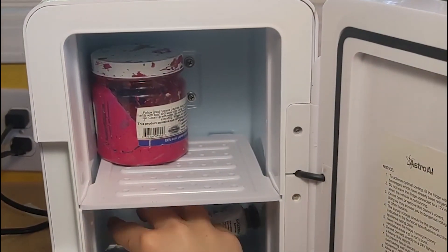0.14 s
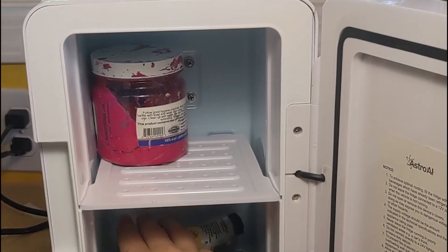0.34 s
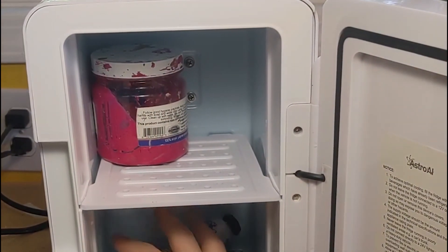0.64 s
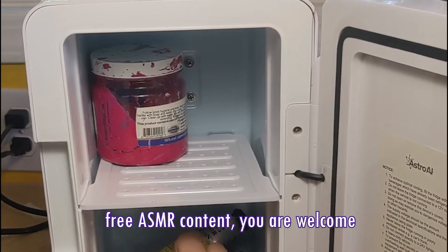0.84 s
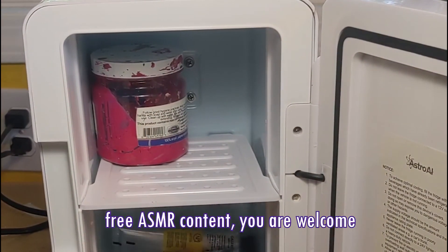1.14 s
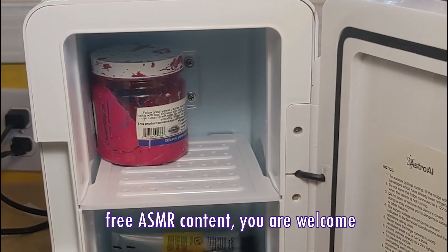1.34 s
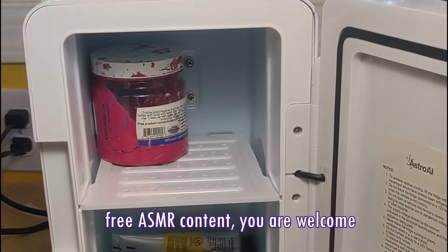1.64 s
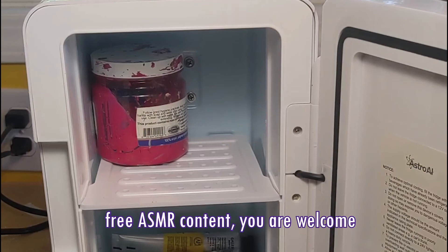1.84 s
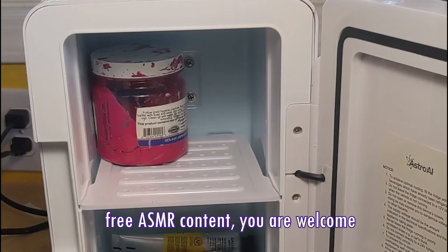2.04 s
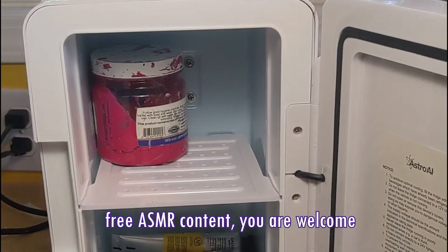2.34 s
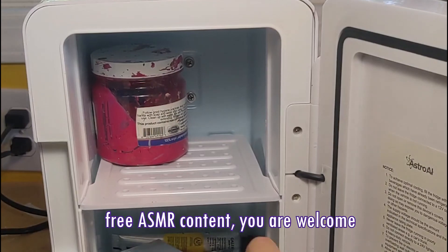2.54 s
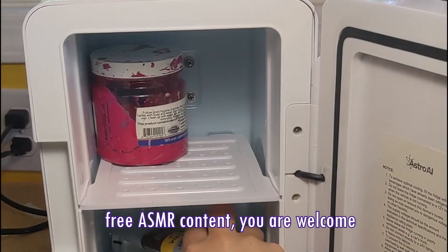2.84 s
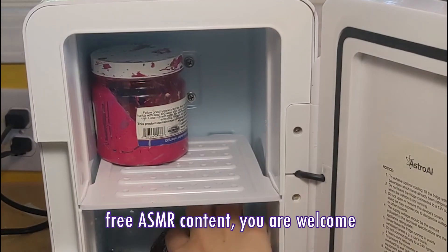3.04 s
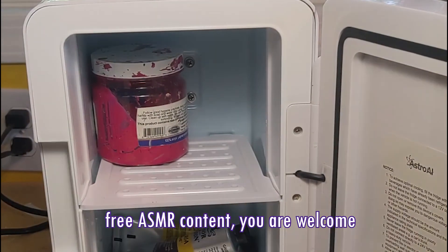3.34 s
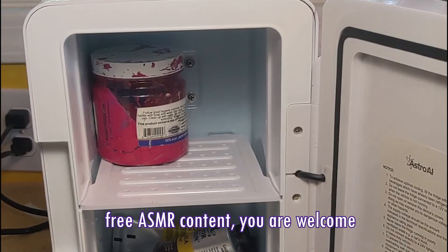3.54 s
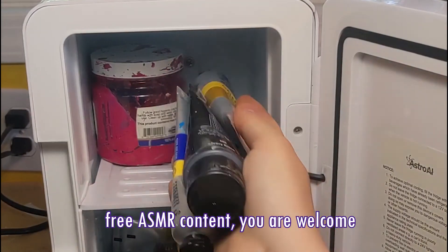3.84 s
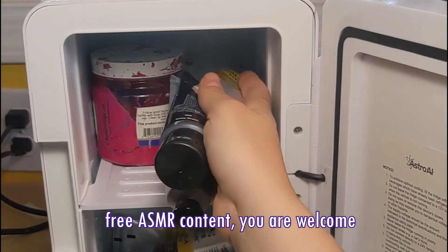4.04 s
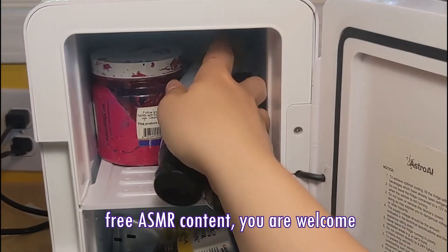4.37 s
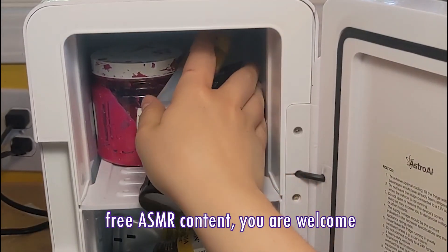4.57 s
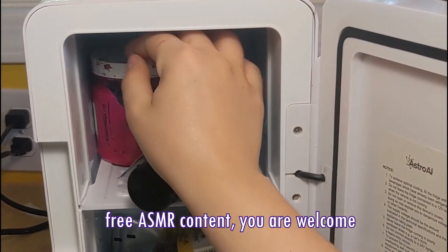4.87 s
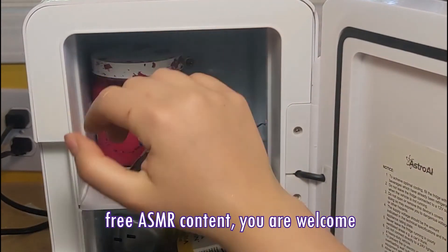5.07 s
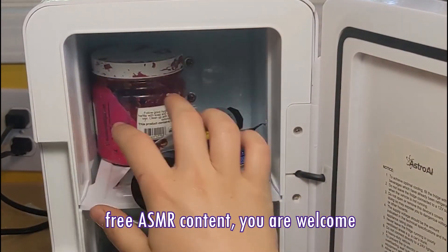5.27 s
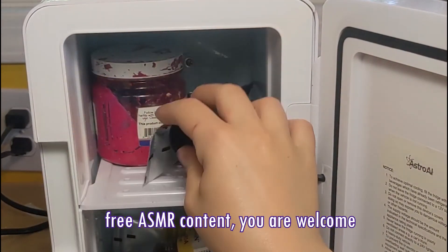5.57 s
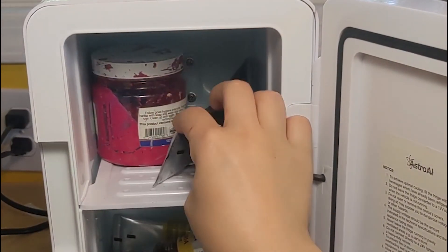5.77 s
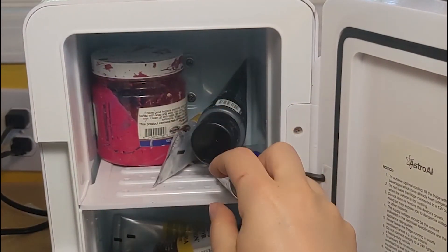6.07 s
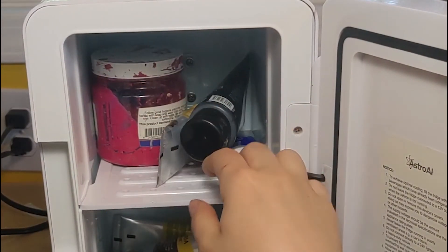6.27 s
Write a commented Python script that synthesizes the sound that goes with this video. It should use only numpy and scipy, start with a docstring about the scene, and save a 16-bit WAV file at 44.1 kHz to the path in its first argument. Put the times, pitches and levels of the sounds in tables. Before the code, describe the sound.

A small cooling fan hums faintly and steadily throughout, a soft airy noise with slightly wavering tones. Very close stereo microphones hear plastic paint tubes handled in a hollow little fridge. A strong boxy knock lands around 0.25 s, light touches near 0.6 s, then firm clacks at 0.9-1.2 s. From 1.5 to 2.5 s come light ticks and short, gritty stick-slip scrapes, with a clearer knock near 2.05 s. Hard knocks at 2.67 and 2.84 s lead into smaller taps and scrapes until 3.3 s. Only the fan remains until a faint slide near 4 s. Clicks and scrapes crowd 4.2-5.1 s, strongest around 4.85 s. After a quieter spell and a soft drag near 5.5 s, a very hard, bright, slightly overloaded clack strikes at 5.7 s. Another lull follows, then a few dull knocks and a short scrape at 6.1-6.4 s. Every blow rings briefly.

```python
"""A small cooling fan hums faintly all through, while a hand packs plastic paint tubes into a small fridge.
Firm knocks come first, then light ticks and short scrapes as pushed tubes stick and slip along the plastic.
More knocks and scrapes follow, with a pause after 3.3 s; a very hard knock comes near 5.7 s, then a few more.
Each blow adds ringing modes of the hollow cabinet to dense coloured noise, split into thud, knock, clack
and tick. Slides are trains of tiny blows, the fan is shaped noise, and the loudest peaks overload."""
import sys
import numpy as np
from scipy import signal
from scipy.fft import rfft, irfft, next_fast_len
from scipy.io import wavfile

SR = 44100
rng = np.random.default_rng(int(sys.argv[2]) if len(sys.argv) > 2 else 0)


def master_out(mix):
    """Clip the mix to full scale and print it as 16-bit PCM to the path in sys.argv[1]."""
    frames = np.transpose(np.atleast_2d(mix))
    ceiling = np.clip(frames, -1, 1)
    pcm = np.round(ceiling * 32767).astype(np.int16)
    wavfile.write(sys.argv[1], SR, pcm)


N = 282681
RING = np.arange(9000) / SR  # time axis of one ringing blow, in seconds

# The four voices of struck plastic: thud, knock, clack and tick.
# Each row: low edge in Hz, high edge in Hz, dense ringing against the modes in dB, crack level in dB,
# early decay time in s, tail level in dB, time for the tail to fall 60 dB in s.
VOICES = [(50, 165, 5.5, -6, 0.04, -7, 0.36), (209, 820, -0.5, -12, 0.0079, -11.5, 0.28),
          (759, 3340, 5, 0, 0.01, -7.5, 0.24), (3840, 40000, 6, 2, 0.0057, -8, 0.2)]


def amp(db):
    """Turns decibels into a gain."""
    return 10 ** (np.asarray(db) / 20)


def evened(x):
    """Scales a sound to an rms level of 1."""
    return x / np.sqrt(np.mean(x ** 2) + 1e-20)


def unit(x):
    """Scales a sound to an average energy of 1 per channel."""
    return evened(x) / np.sqrt(x.shape[-1])


def read(points, hz):
    """Reads a table between its points, on a log-frequency axis."""
    f, value = np.transpose(points)
    return np.interp(np.log(hz + 1), np.log(f), value)


def add(mix, s, sound):
    """Mixes a sound in, starting at s seconds."""
    part = mix[:, max(round(s * SR), 0):][:, :sound.shape[-1]]
    part += sound[:, :part.shape[-1]]


def band(x, low_hz, high_hz):
    """Keeps only the sound between two frequencies."""
    edges_hz = [low_hz, min(high_hz, SR * .45)]
    return signal.sosfilt(signal.butter(N=3, Wn=edges_hz, btype="band", fs=SR, output="sos"), x)


def noise(spectrum, same, size, count=1):
    """Makes rows of coloured stereo noise whose two sides are partly alike."""
    hz = np.fft.rfftfreq(size, 1 / SR)
    left, other = rfft(rng.standard_normal((2, count, size))) * amp(read(spectrum, hz))
    likeness = np.clip(read(same, hz), 0, 1)
    right = likeness * left + np.sqrt(1 - likeness ** 2) * other
    return evened(irfft(np.stack([left, right], axis=1), size))


def fan(air_db=-47.5, width_hz=3.1):
    """Moving air is broad noise; the fan and its housing add narrow noise bands, heard as wavering tones."""
    # Each row: frequency in Hz, relative level of room and fan air in dB per Hz.
    air_spectrum = [(15, -30), (25, -19), (55, -4), (84, -20.5), (123, -9), (256, -9.5), (293, -4),
                    (384, -10.5), (607, -10.5), (775, -16.5), (1190, -12), (1400, -15.5), (1520, -18),
                    (2840, -25.5), (16000, -45.5)]
    # Each row: frequency in Hz, left-right likeness from 0 to 1.
    air_likeness = [(60, 0.48), (180, 1), (550, 0.38), (1650, 0.006), (5000, 0.034), (15000, 0.22)]
    # Each row: tone of the fan or its housing in Hz, level in dB.
    fan_tones = [(291, -64.5), (500, -67), (613, -59.5), (872, -74), (996, -68), (1168, -59), (1502, -66.5),
                 (1836, -68.5)]
    size = next_fast_len(N)
    hz = np.fft.rfftfreq(size, 1 / SR)
    lines = sum(amp(db) / (1 + ((hz - f) / width_hz) ** 2) for f, db in fan_tones)
    hum = evened(irfft(rfft(rng.standard_normal(size)) * lines, size))
    hum = hum * np.linalg.norm(amp([db for _, db in fan_tones]))
    air = amp(air_db) * noise(air_spectrum, air_likeness, size=size)[0]
    return (air + hum)[:, :N]


def shell(x, ring_hz, ring_db=4, sharpness=11, overtone=1.65, overtone_db=-5, cap_hz=2800, cap_db=4):
    """The tube wall stresses one resonance and its overtone; stiff caps ring higher and more clearly."""
    cap = np.clip(1 + 3 * np.log2(ring_hz / cap_hz), 0, 1)  # 0 for a soft tube, 1 for a stiff cap

    def resonance(hz):
        return signal.lfilter(*signal.iirpeak(min(hz, SR * .4), sharpness, fs=SR), x)

    first, second = resonance(ring_hz), resonance(ring_hz * overtone)
    return x + amp(ring_db + cap_db * cap) * first + amp(overtone_db) * second


def strikes(centres_hz, rings_hz, knocks_db):
    """A contact sets off cabinet modes and many tiny ones; returns (strikes, voices, channels, samples)."""
    # Modes of the cabinet, its cavity and the shelf.
    # Each row: frequency in Hz, relative level in dB, time to fall 60 dB in s.
    mode_table = [(68, -8, 0.51), (131, -18, .14), (159, 8.5, 0.054), (221, -5, 0.28), (255.1, -0.5, 0.15),
                  (283, -38, 0.25), (348.4, -4.5, 0.2), (372.2, -3, 0.14), (402.2, -4.5, 0.2),
                  (431, -12.5, 0.27), (494.2, -4, 0.18), (516, -6, 0.072), (566, -4, 0.14),
                  (610, -8.5, 0.28), (705.7, -3, 0.14), (786, -15.5, 0.076), (1018, -2, 0.22),
                  (1185, 0.5, 0.08), (1290, -3.5, 0.24), (1540, -27, .18), (1710, -30, 0.21),
                  (2204, -10.5, 0.15), (2440, -40, 0.098), (2650, 0, 0.024), (2740, -2, 0.053),
                  (2980, 2, 0.024), (3190, -22, 0.29), (3125, -10, 0.033), (3720, -50, 0.047),
                  (4700, -20, 0.18), (9200, -25, .15)]
    # Countless small modes. Each row: frequency in Hz, relative level in dB per Hz.
    dense_spectrum = [(50, -15), (400, 14), (900, 3.5), (1400, 5), (2000, 1), (3000, -5), (4500, -2.5),
                      (6200, -0.5), (8000, -4), (11000, -8.5), (16000, -14.5)]
    dense_likeness = [(200, 1.0), (700, 0.6), (2000, 0.15), (12000, 0.067)]  # Hz, left-right likeness
    place_db, focus_db = 2, 10  # random spread per mode; loss one octave or more from the centre
    push_db, push_growth, push_s = 11, 0.073, 0.0016  # level at 0 dB strength, dB per dB, decay time
    crack_s = 0.0016  # decay time of the crack

    count = len(centres_hz)
    centre, knock_db = np.asarray(centres_hz)[:, None], np.asarray(knocks_db)[:, None]
    hz, db, t60 = np.transpose(mode_table)
    # the place of contact weights the modes, favouring those near the centre of the knock
    octaves = np.minimum(abs(np.log2(hz / centre)), 1)
    place = place_db * rng.standard_normal((count, len(hz)))
    weights = amp(db + place - focus_db * octaves ** 2)
    modes = weights @ (np.sin(2 * np.pi * hz[:, None] * RING) * amp(-60 * RING / t60[:, None]))
    # the panel's first swing dies away fast and is a little larger under a hard blow
    swing = np.sin(2 * np.pi * centre * RING) * np.exp(-RING / push_s)
    modes = modes + amp(push_db + push_growth * knock_db) * swing
    dense = noise(dense_spectrum, dense_likeness, size=len(RING), count=count)
    modes = np.array([shell(x, f) for x, f in zip(modes, rings_hz)])
    dense = np.array([shell(x, f) for x, f in zip(dense, rings_hz)])

    voices = []
    for low_hz, high_hz, dense_db, crack_db, early_s, tail_db, tail_t60 in VOICES:
        crack = amp(crack_db) * np.exp(-RING / crack_s)
        inside_box = np.exp(-RING / early_s)  # reflections inside the box
        room = amp(tail_db - 60 * RING / tail_t60)
        tones = band(modes, low_hz, high_hz)
        washes = band(dense * (crack + inside_box + room), low_hz, high_hz)
        voices.append([unit(unit(tone) + amp(dense_db) * unit(wash)) for tone, wash in zip(tones, washes)])
    return np.swapaxes(voices, 0, 1)


def voice_levels(strength_db, hardness_db, weight_db, ring_hz):
    """A hard cap is bright, a soft tube dull: gives thud, knock, clack and tick levels in dB."""
    # One row each for thud, knock, clack and tick.
    # Each row: level in dB, share of strength, share of hardness, share of weight (all in dB per dB).
    drive = [(-31, .5, .3, 1), (0, 1, 0, 0), (-7.5, 1, .6, 0), (-21, 1, 1, 0)]
    # A tube ringing in the middle clacks most, a small high-ringing cap least.
    # Each row: ring in Hz, added clack in dB.
    clack_by_ring = [(1000, 0.5), (1500, -0.5), (2300, 2), (2850, -3), (5000, -4)]
    levels_db = np.dot(drive, [1, strength_db, hardness_db, weight_db])
    return levels_db + [0, 0, read(clack_by_ring, ring_hz), 0]


def slides(centre_hz=370, wander=0.017, count=2):
    """Stick and slip: a swelling train of tiny uneven blows, whose ring shifts as the contact moves on."""
    # Tubes pushed along the plastic. Each row: start in s, hardest moment in s, end in s, strength in dB,
    # hardness of the contact in dB, weight (how much sinks into the cabinet) in dB, ring of the tube in Hz.
    slide_table = [(1.542, 1.624, 1.68, -44.5, 17.5, 2, 2230), (1.758, 1.81, 1.86, -30, 15.5, 1, 1040),
                   (1.874, 1.944, 1.99, -42.5, 19, 1, 6200), (1.981, 1.992, 2.018, -59.5, 52, -13, 4870),
                   (2.038, 2.128, 2.185, -32.5, 13, 0, 2010), (2.243, 2.385, 2.44, -43, 9.5, 1, 1470),
                   (2.815, 2.842, 2.99, -40.5, 6.5, -4, 1300), (2.987, 3.02, 3.08, -31.5, 0.5, 3, 4100),
                   (3.207, 3.31, 3.32, -63.5, 30, -16, 1390), (3.932, 4.113, 4.15, -57.5, 22.5, -5, 1150),
                   (4.197, 4.216, 4.28, -39.5, 7, -9, 1150), (4.288, 4.39, 4.41, -39.5, 7, -5, 2250),
                   (4.374, 4.394, 4.55, -41.5, 5, 0, 2540), (4.639, 4.774, 4.82, -27.5, 5, -1, 1080),
                   (4.828, 4.879, 4.91, -21, 11, 2.5, 3460), (5.371, 5.514, 5.62, -43.5, 10, -7, 1150),
                   (5.663, 5.684, 5.74, -16.5, 16.5, -8, 3100), (6.148, 6.285, 6.37, -32, 4, 1, 1090)]
    slips_per_s, slip_spread_db = 700, 5
    out = np.zeros((2, N))
    sizes = amp(slip_spread_db * np.minimum(rng.exponential(1, N), 4)) * rng.choice([-1, 1], N)
    slips = sizes * (rng.random(N) < slips_per_s / SR)
    # each slide touches at `count` places with slightly different rings
    *_, strengths_db, _, _, rings_hz = np.repeat(slide_table, count, axis=0).T
    rings_hz = rings_hz * np.exp(wander * rng.uniform(-1.5, 1, len(rings_hz)))
    places = strikes([centre_hz] * len(rings_hz), rings_hz, strengths_db)
    places = places.reshape(len(slide_table), count, len(VOICES), 2, -1)
    for (start, hardest, end, *contact), contacts in zip(slide_table, places):
        at = np.arange(max(int(start * SR), 0), min(int(end * SR), N))
        force = evened(slips[at]) * np.interp(at / SR, [start, hardest, end], [0, 1, 0])
        # the contact moves on as the energy is spent
        spent = np.cumsum(force ** 2) / (np.sum(force ** 2) + 1e-20)
        place = np.round((count - 1) * spent)
        gains = amp(voice_levels(*contact))
        for k, voices in enumerate(contacts):
            ring = np.tensordot(gains, voices, 1)
            add(out, start, signal.fftconvolve((force * (place == k))[None], ring, axes=1))
    return out


def blows():
    """Single contacts of tubes with walls, shelf and each other: strong, hard ones knock higher, heavy lower."""
    # Each row: start in s, strength in dB, hardness of the contact in dB,
    # weight (how much of the blow sinks into the cabinet) in dB, ring of the tube in Hz.
    blow_table = [(0.072, -21.5, -1, 1, 5110.0), (0.2445, -5.5, -11.5, -17, 1490),
                  (0.2727, -16, -1.5, -12, 1360), (0.284, -21.5, -1.5, 14, 1480), (0.6, -33, 4, -20, 5500),
                  (0.637, -41, -24, -3.0, 1180.0), (0.68, -39, -7, -2, 1140.0),
                  (0.9312, -16.0, 2, 0, 1360.0), (0.9983, -32.5, 7, -11, 1150),
                  (1.0109, -9, -4.5, -7, 1130), (1.113, -26.5, -7.5, 2, 1510.0),
                  (1.129, -30, 0.5, 4, 1150.0), (1.1588, -16, 6.5, -5, 2840), (1.518, -36, 21, 6.5, 2360),
                  (1.6023, -35.5, -1, -4, 2100), (1.628, -38.5, 17, 1.0, 2320), (1.739, -41, 11, -3, 2580),
                  (1.796, -42.5, 19, -11, 990), (1.8228, -28, 18, 1.5, 940), (2.034, -38, 17, -6.0, 1240),
                  (2.0431, -20, 9.5, 6, 1220), (2.149, -30.5, 10.5, -19, 2180),
                  (2.282, -65, 38, -5, 6200.0), (2.385, -38.5, -9, 13, 2480),
                  (2.396, -67.5, 41.5, -12, 6400), (2.4978, -44.5, 15.5, -1, 1210),
                  (2.6651, -11.0, -1.5, -6, 2570.0), (2.693, -22.0, -10, 3, 2240.0),
                  (2.7426, -33, 8.5, -1, 2800), (2.8407, -10, -26, 5, 1300), (3.0167, -28, 2, -1, 3960),
                  (3.1086, -29.0, -4.0, 3.0, 1310.0), (3.1901, -26, 2, 2, 1520),
                  (3.199, -21, -12, -5, 1360.0), (3.2228, -29.5, 5.5, 2, 4170.0),
                  (3.264, -35, -7, -5, 1390.0), (4.155, -41.0, 6.5, 5, 1190.0), (4.211, -38.5, 5, 2, 1110),
                  (4.2853, -23.5, 1, -4, 1920), (4.3552, -32.5, -2, -6, 2300.0),
                  (4.3697, -31.5, 11, 0, 2240.0), (4.431, -41, 9.5, 2, 2600), (4.564, -25.5, 5.5, -8, 2470),
                  (4.677, -32, 6.5, -7.0, 2420), (4.706, -38, 9, 5, 1230.0), (4.72, -39, -10, 10, 3060.0),
                  (4.738, -32.5, 11.5, 9, 1070.0), (4.7491, -23.5, 12, -12, 920),
                  (4.789, -26, 2.5, -8, 1370.0), (4.8464, -22.0, 5, -4, 3190.0),
                  (4.853, -17.0, 18.5, -11.0, 3190), (4.9927, -36.5, 4, -6.0, 1460),
                  (5.0736, -32.0, 1.5, 1, 1200), (5.4601, -38.0, 3, -8.0, 2900.0),
                  (5.599, -27.5, 3, -12, 2980.0), (5.6241, -25, 9, -13, 3160),
                  (5.671, -14.5, 12.0, -18, 2750), (5.6799, -21.5, 24.5, -4, 2870),
                  (5.692, -4.5, 3.5, 0, 3150), (5.702, -32, 15, 4, 2780.0), (5.75, -28.5, 12, 0, 3200.0),
                  (6.114, -35.5, 14.5, -9, 2700.0), (6.147, -21.5, -5, -5, 2070),
                  (6.2461, -44, 21.5, -12, 2530.0), (6.282, -24.0, -10, 4, 1160.0),
                  (6.3124, -29.5, -2.5, 2, 1100)]
    soft_db, hard_db = -27, -10  # strength of a light touch and of a hard blow
    soft_hz, hard_hz = 308, 474  # centres of their knocks, before hardness and weight shift them
    hard_rise, heavy_drop = 0.0027, 0.0081  # octaves per dB of hardness and of weight
    out = np.zeros((2, N))
    span = np.sqrt(SR / 50)  # levels count over a fiftieth of a second
    _, strengths_db, hardnesses_db, weights_db, rings_hz = np.transpose(blow_table)
    centres_hz = np.interp(strengths_db, [soft_db, hard_db], [soft_hz, hard_hz])
    centres_hz = centres_hz * 2 ** (hard_rise * hardnesses_db - heavy_drop * weights_db)
    rings = strikes(centres_hz, rings_hz, strengths_db)
    for (s, *contact), voices in zip(blow_table, rings):
        add(out, s, span * np.tensordot(amp(voice_levels(*contact)), voices, 1))
    return out


def ports(x):
    """Two close microphones differ in level and phase by pitch: the right one hears the fridge brighter."""
    # Each row: frequency in Hz, left minus right level in dB.
    side_db = [(60, 0), (160, 0), (450, -0.5), (740, 0), (1200, 1.5), (2000, -2.5), (2900, -6.5),
               (4000, -3), (9000, -6), (15000, -6.5)]
    # Each row: frequency in Hz, how far the left leads in radians.
    side_phase = [(50, 0), (300, 0.32), (600, 1.22), (900, -1.13), (1400, -2.5), (2200, -1.7),
                  (3200, -1.83), (4400, -3.1), (6000, -2), (15000, -14)]
    size = next_fast_len(N + len(RING))
    hz = np.fft.rfftfreq(size, 1 / SR)
    tilt = amp(read(side_db, hz))
    left = tilt * np.exp(1j * read(side_phase, hz))
    right = np.ones(len(hz))
    gains = np.array([left, right]) / np.sqrt((1 + tilt ** 2) / 2)  # keeps the mean power
    return irfft(rfft(x, size) * gains, size)[:, :N]


def scene():
    """Knocks and scrapes over the fan."""
    return ports(blows() + slides()) + fan()


def record(dry, edge_hz=16300):
    """The loudest peaks overload and clip at full scale; then a low-pass removes the highest treble."""
    clipped = np.clip(dry, -1, 1)
    low_pass = signal.firwin(511, edge_hz, window=("kaiser", 8), fs=SR)
    return signal.oaconvolve(clipped, low_pass[None], "same")


dry = scene()
out = record(dry)
master_out(out)
```